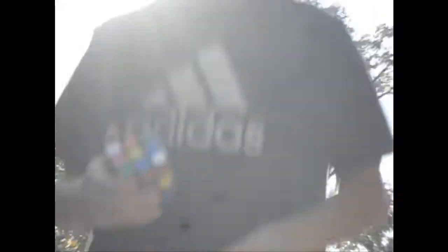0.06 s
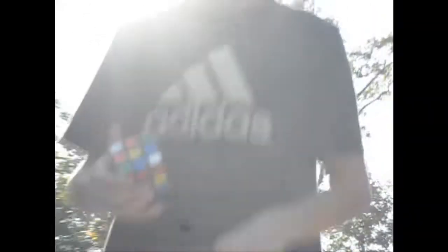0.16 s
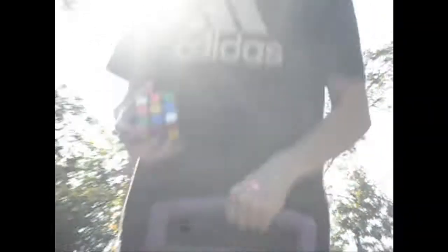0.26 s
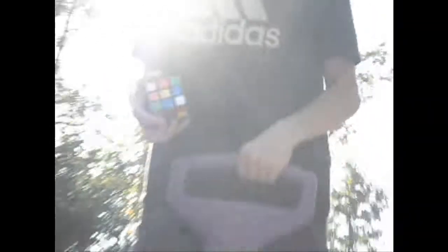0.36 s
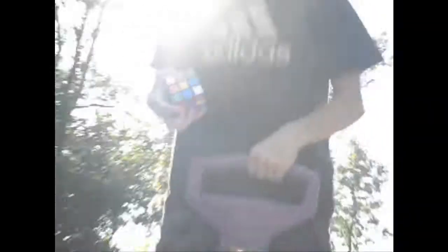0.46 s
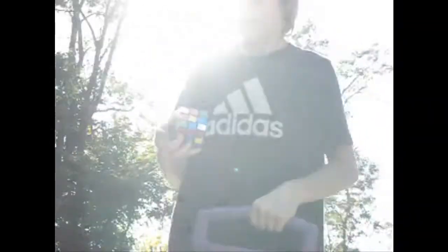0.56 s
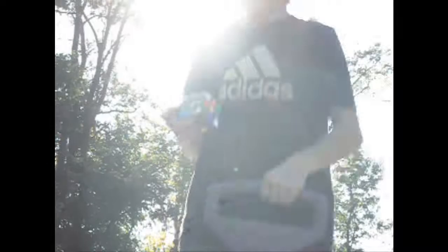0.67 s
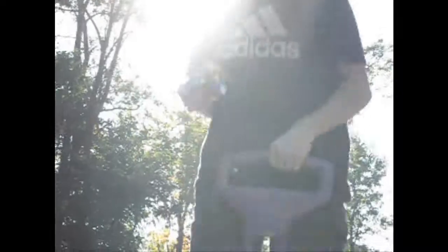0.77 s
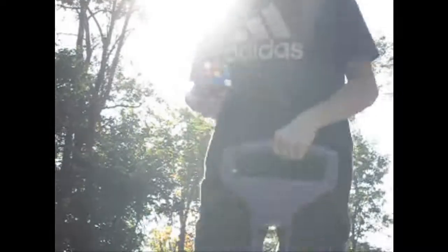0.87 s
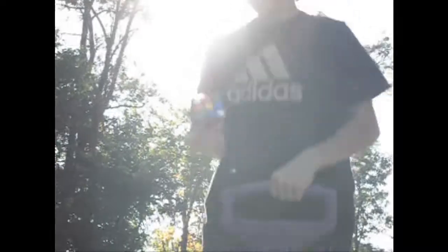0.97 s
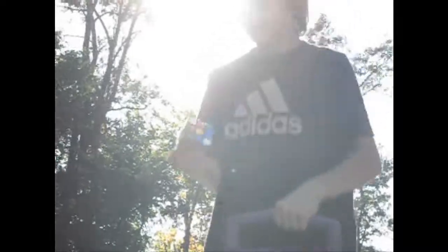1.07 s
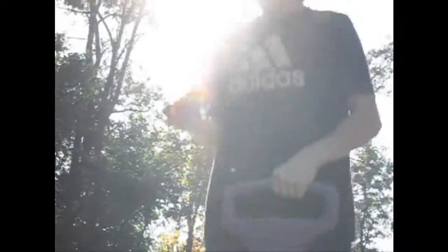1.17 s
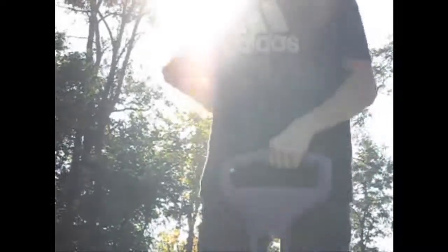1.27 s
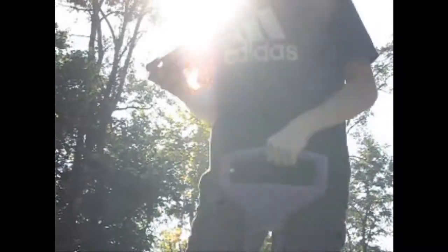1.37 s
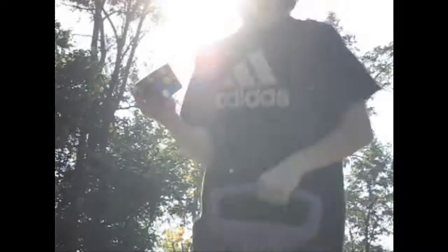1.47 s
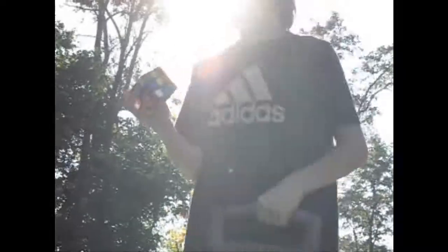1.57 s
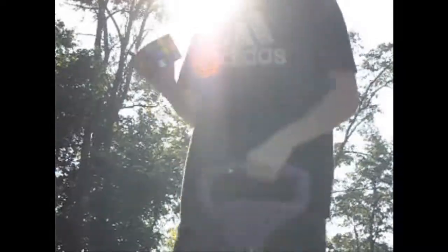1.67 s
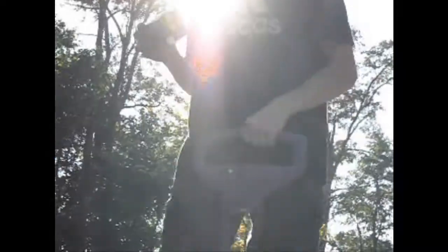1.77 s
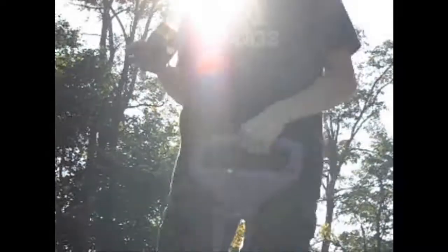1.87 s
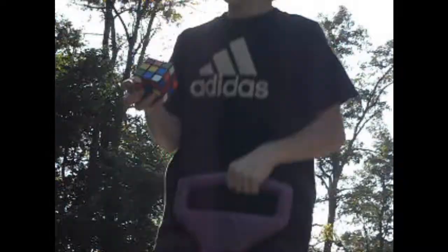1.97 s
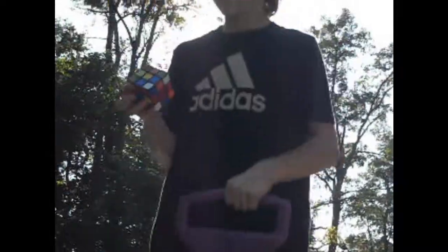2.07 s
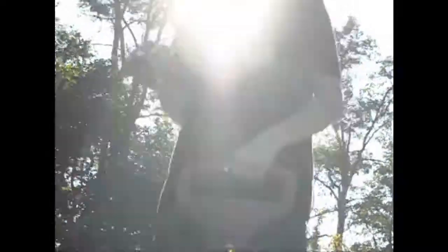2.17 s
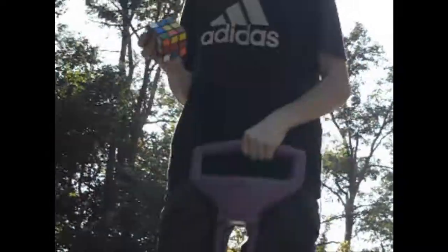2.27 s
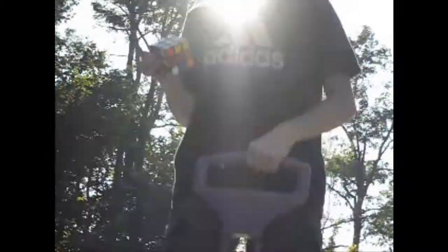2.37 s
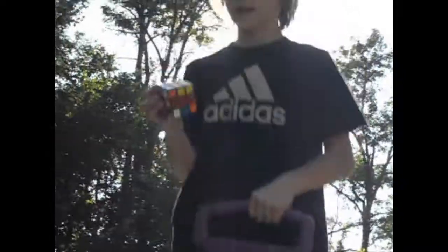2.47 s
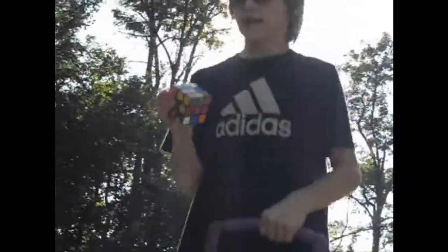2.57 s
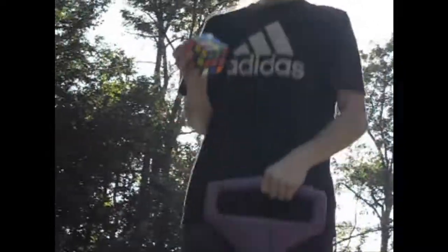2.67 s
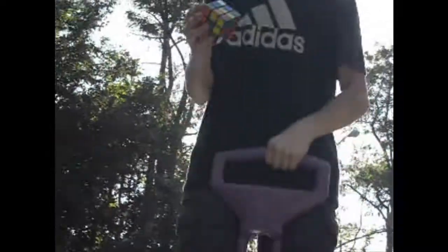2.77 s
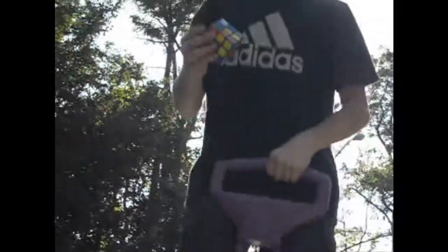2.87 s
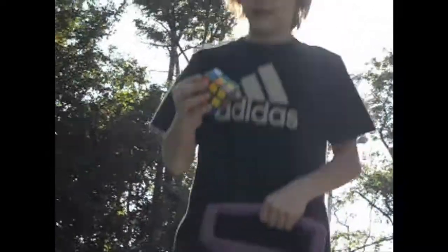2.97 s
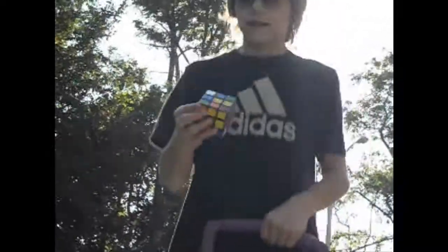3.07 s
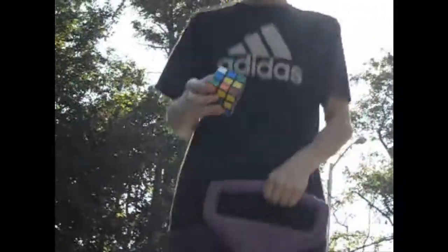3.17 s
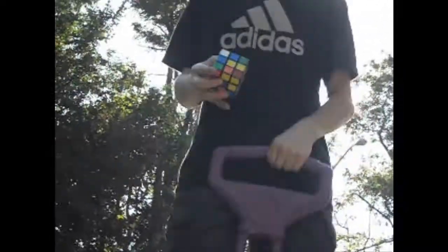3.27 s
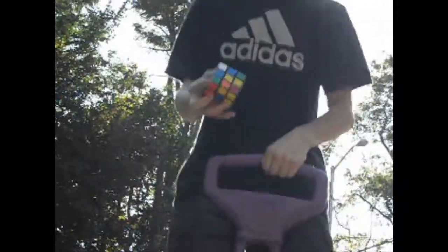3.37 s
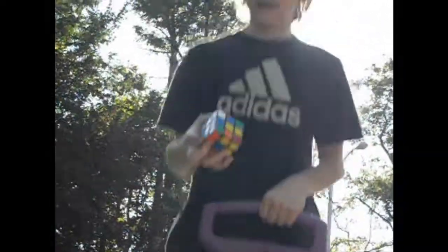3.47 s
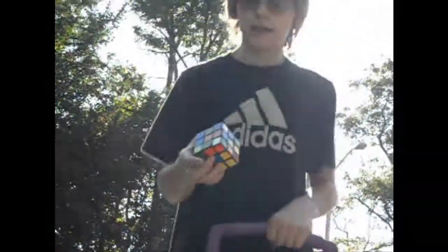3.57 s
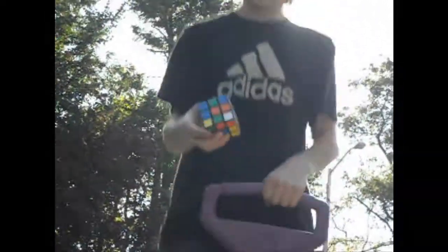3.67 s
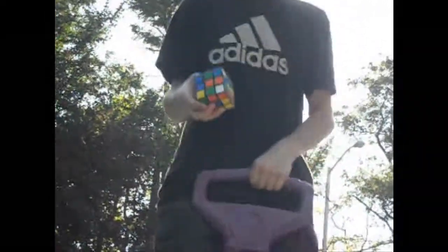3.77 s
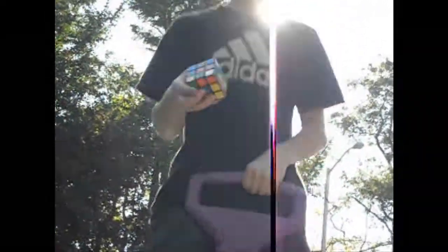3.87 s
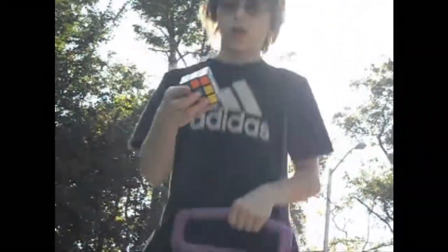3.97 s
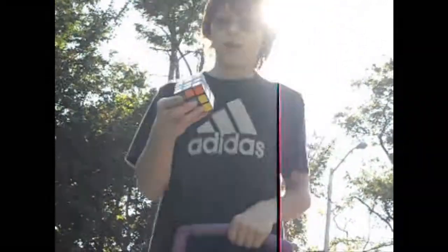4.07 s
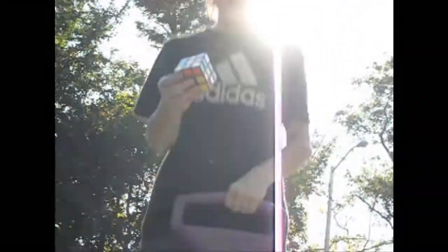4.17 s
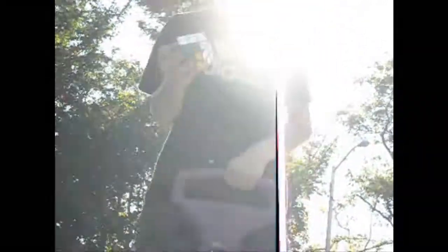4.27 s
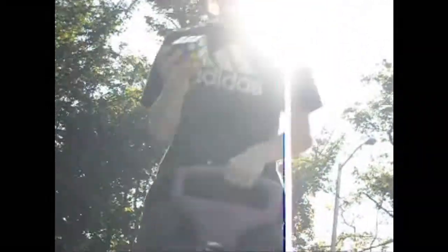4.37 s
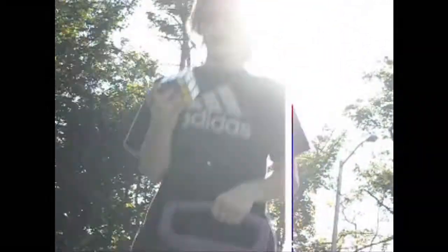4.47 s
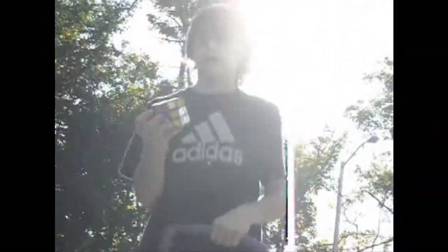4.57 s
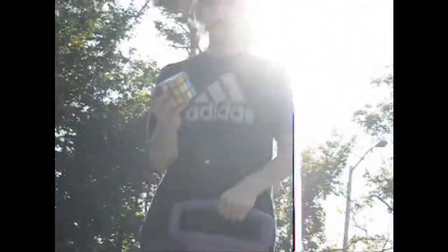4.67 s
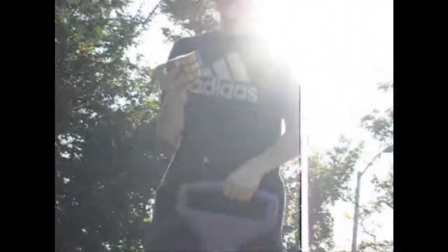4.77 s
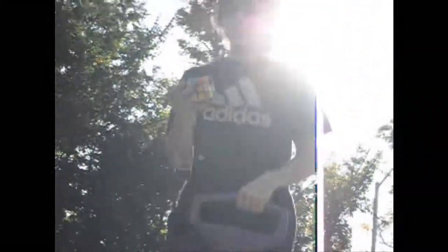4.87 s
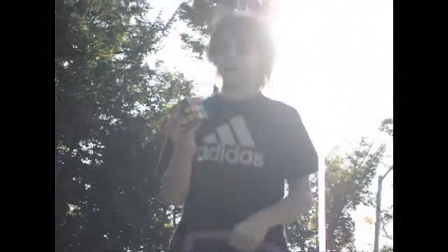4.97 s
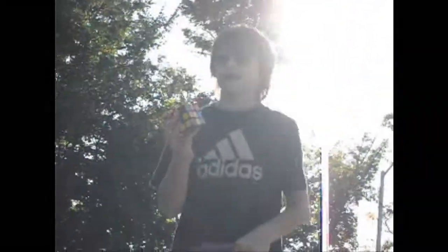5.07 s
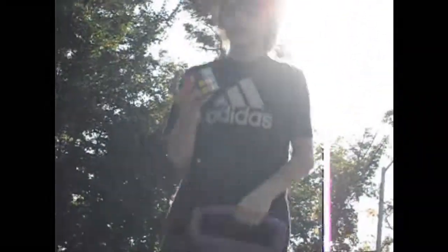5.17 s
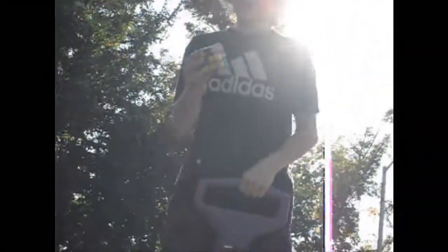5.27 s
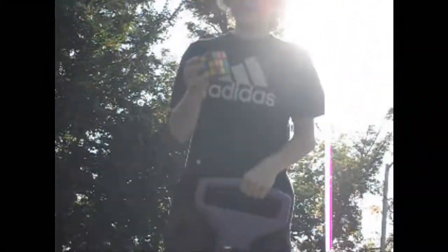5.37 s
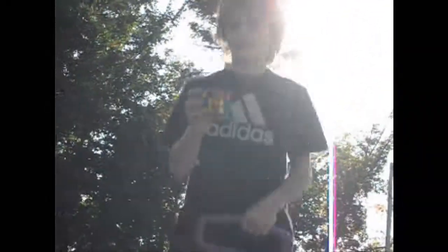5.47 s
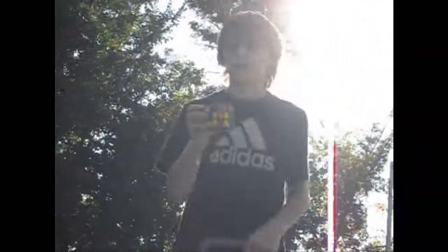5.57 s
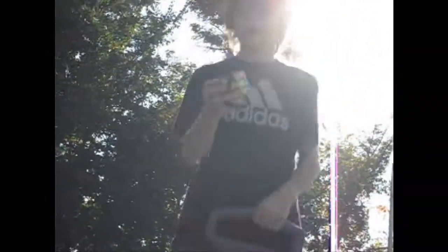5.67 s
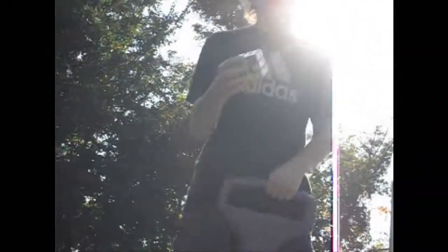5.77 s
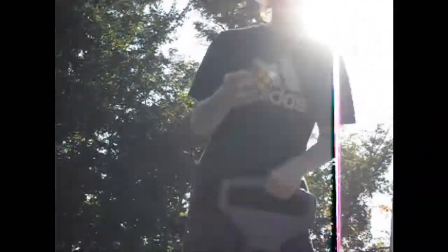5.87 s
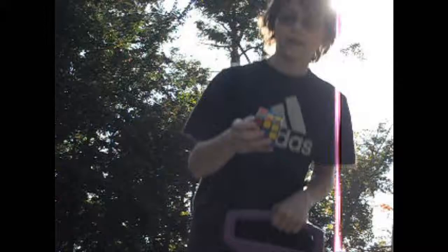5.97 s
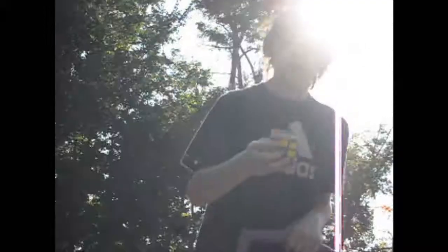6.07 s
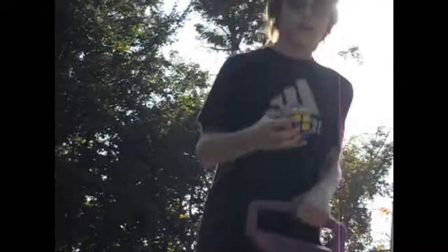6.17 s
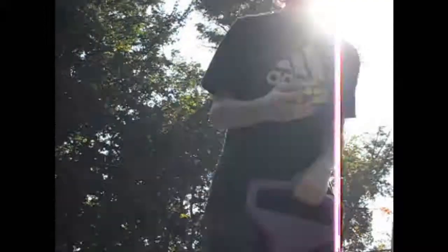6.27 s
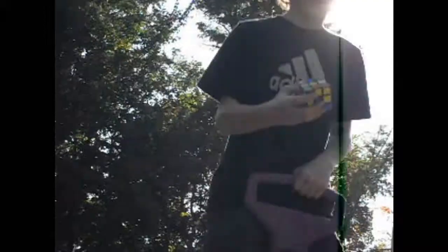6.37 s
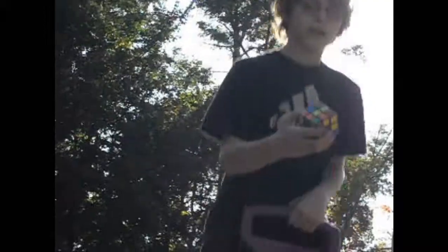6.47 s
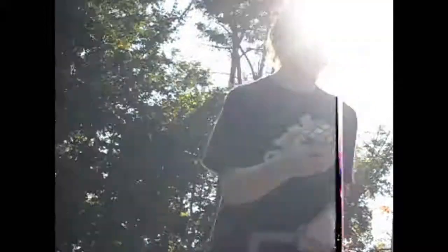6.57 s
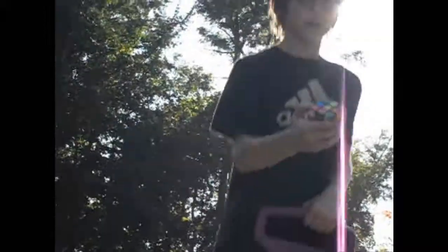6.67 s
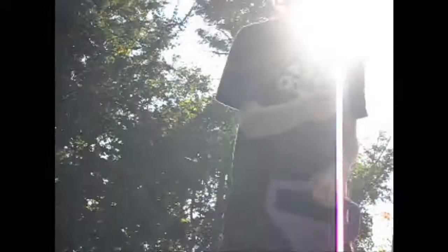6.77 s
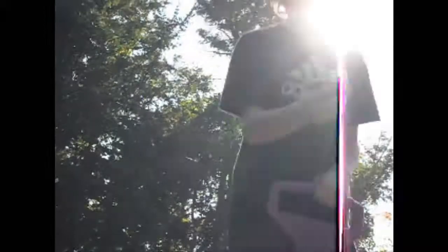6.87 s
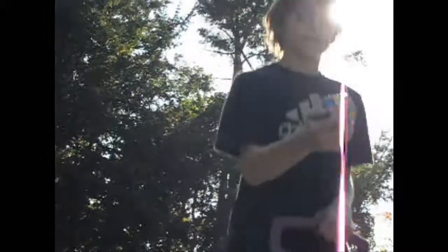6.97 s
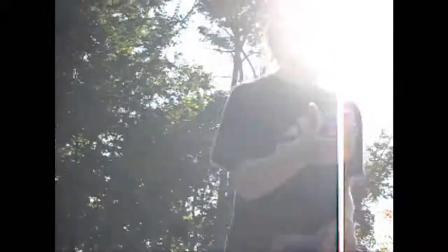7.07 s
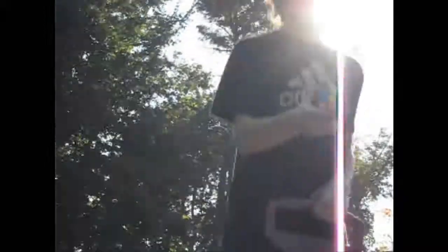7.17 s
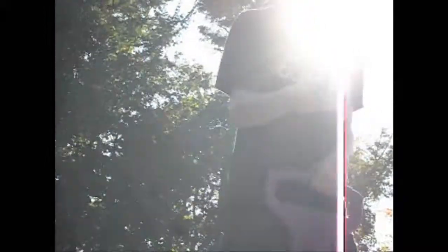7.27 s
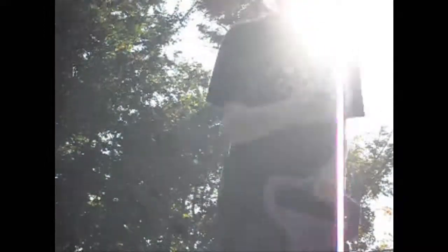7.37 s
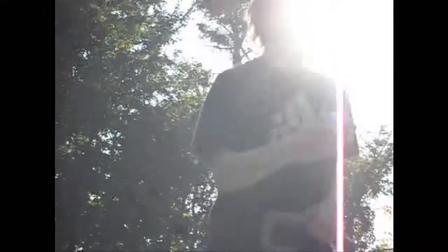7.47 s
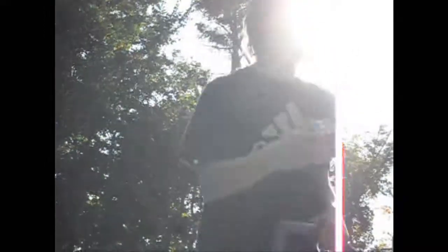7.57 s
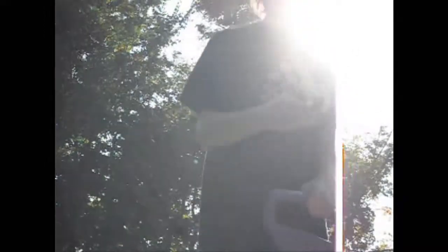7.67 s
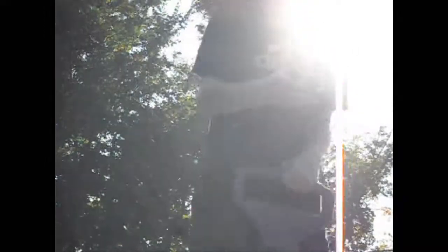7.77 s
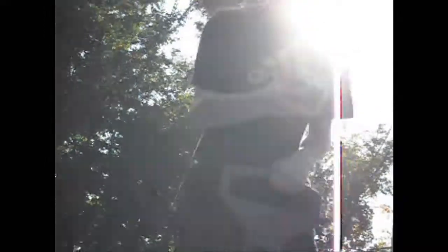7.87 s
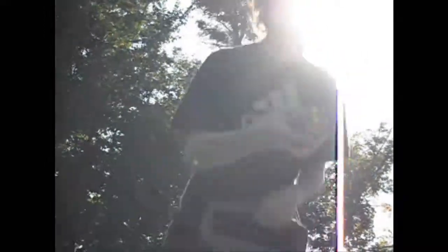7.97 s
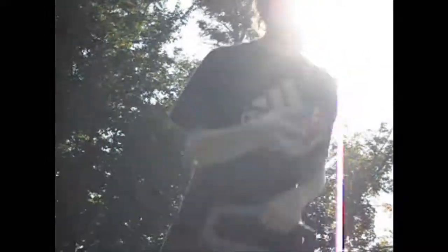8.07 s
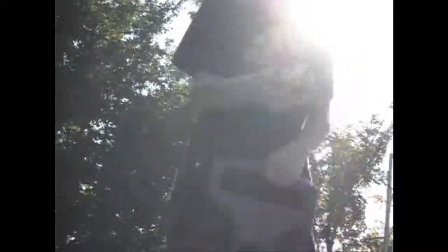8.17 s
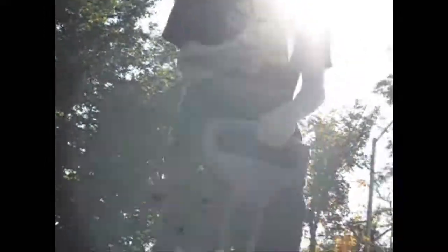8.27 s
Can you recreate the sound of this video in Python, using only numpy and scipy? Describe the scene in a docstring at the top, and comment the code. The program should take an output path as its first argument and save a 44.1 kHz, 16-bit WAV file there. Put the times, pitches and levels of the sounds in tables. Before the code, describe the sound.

After about half a second of silence, a pogo stick is heard bouncing close by on an asphalt road. The first sharp metallic clack comes at 0.7 seconds and repeats about every half second until just after 8 seconds. Each clack is the shaft hitting its stop at take-off, with a short, soft twang from the spring. Between the clacks come quieter, gritty landings, with the coil rattling and sometimes knocking as it compresses. A slight dull echo follows the hits, and very faint rustles fall between them. Distant traffic rumbles quietly throughout. A far engine faintly revs up from about 1 to 2.6 seconds. A car swells past around 4.3 seconds and a softer one around 8 seconds, while faint low hums surface in the rumble from about 5.7 seconds. The bouncing stays even up to the end at about 8.3 seconds.

```python
"""A pogo stick bounces on a road, each impact exciting its damped modes. The tip lands and the coil spring
rattles on its shaft as it compresses; at take-off the shaft clacks against its stop and the freed spring
twangs. The shaft hisses in its guide, faint rustles fall between blows, and trees and walls scatter a dull
echo. Far traffic rumbles and roars, an engine revs up, cars pass and low hums surface.
The sound starts after a short silence."""
import sys
import numpy as np
from scipy import signal
from scipy.fft import rfft, irfft, next_fast_len
from scipy.io import wavfile

SR = 44100
rng = np.random.default_rng(int(sys.argv[2]) if len(sys.argv) > 2 else 0)


def dump(signal):
    """Clip the signal to [-1, 1] and save it as 16-bit WAV at the path in sys.argv[1]."""
    limited = np.clip(np.atleast_2d(signal).T, -1, 1)
    pcm = np.round(limited * 32767).astype(np.int16)
    wavfile.write(sys.argv[1], SR, pcm)


N = 366912
START_S = .5585   # end of the silence


def from_db(db):
    """Amplitude ratio of a level in dB."""
    return 10 ** (np.asarray(db) / 20)


def rms_one(x):
    """Normalisation to rms 1."""
    return x / np.sqrt(np.mean(x ** 2) + 1e-20)


def add(out, s, sound):
    """Superposition: mixes a sound in at a time in seconds."""
    at = round(s * SR)
    out[at:at + len(sound)] += sound[:N - at]


def in_time(rows):
    """Linear interpolation of a table's columns at every sample."""
    s, *columns = np.transpose(rows)
    return [np.interp(np.arange(N) / SR, s, c) for c in columns]


def drift(rate_hz):
    """Slow random fluctuation: low-passed noise of rms 1."""
    r = np.exp(-80 * np.pi * rate_hz / SR)
    slow = signal.lfilter([1], [1, -2 * r, r * r], rng.standard_normal(N // 40 + 2002))[2000:]
    return np.interp(np.arange(N) / 40, np.arange(len(slow)), rms_one(slow))


def coloured(spectrum, flicker_db, rate_hz):
    """Spectral shaping: noise of a given spectrum and wavering level, at rms 1."""
    size = next_fast_len(N)
    hz, db = np.transpose(spectrum)
    bins_hz = np.arange(size // 2 + 1) * SR / size
    gain = from_db(np.interp(np.log(bins_hz + 1), np.log(hz), db))
    noise = irfft(rfft(rng.standard_normal(size)) * gain, size)[:N]
    return rms_one(noise * from_db(flicker_db * drift(rate_hz)))


def resonance(x, hz, width):
    """Damped resonator: a two-pole band of peak gain 1."""
    r = np.exp(-np.pi * width / SR)
    poles = [1, -2 * r * np.cos(2 * np.pi * hz / SR), r * r]
    return signal.lfilter(np.array([1, 0, -1]) * (1 - r * r) / 2, poles, x)


def contacts(surface, alike):
    """Partial correlation: the same surfaces meet each time, so a share of the pattern repeats."""
    return np.sqrt(alike) * surface + np.sqrt(1 - alike) * rng.standard_normal(len(surface))


def shaking(contact, rise_s, hit_t60_s, rattle_db, length_s, sag_db, fade_s, grains_db):
    """Contact forces: a brief hit, and coil rattle that sags and dies once the spring stops moving."""
    t = np.arange(len(contact)) / SR
    hit = (1 - np.exp(-(t / rise_s) ** 2)) * from_db(-60 * t / hit_t60_s)
    decay = from_db(rattle_db - sag_db * t / length_s - 60 * np.maximum(t - length_s, 0) / fade_s)
    noise = rng.standard_normal(len(t))
    grains = rms_one(noise * from_db(grains_db * np.minimum(rng.exponential(1, len(t)), 4)))
    bunches = rms_one(signal.lfilter(*signal.butter(2, 150, fs=SR), rng.standard_normal(len(t))))
    rattle = grains * from_db(1.5 * bunches) * decay * np.minimum(t / 0.0037, 1)
    return np.array([contact * hit, rattle])


# modes of the stick: (frequency [Hz], bandwidth [Hz], landing level [dB], take-off level [dB])
STICK_MODES = [(124, 145, -5, -5), (229, 81, -2.5, -2.5), (321, 63, -5.5, -3), (593, 103, -4, -10),
               (670, 66, -4.5, -8), (852, 135, 1, 2.5), (1030, 74, -3.5, -4), (1067, 19, -15, -18),
               (1300, 130, -7, 0), (1502, 155, -3, -7), (1722, 170, -1.5, 3), (1953, 270, 0, -13.5),
               (2150, 107, 1, -13), (2390, 280, -0.5, 4.5), (3200, 630, 0, 0), (3900, 920, -6.5, -3.5),
               (4590, 360, -1.5, -0.5), (5430, 960, -1.5, 0.5), (5724, 390, -1, -0.5),
               (6240, 250, -1.5, -6), (7060, 870, -11, -43), (8700, 1000, -10, -21),
               (9670, 360, -10.5, -11.5)]
AT_LANDING, AT_TAKE_OFF = 2, 3   # its level columns
THUD, BODY, CLANG, GRIT = range(4)   # bands of modes, low to high
BODY_HZ, CLANG_HZ, GRIT_HZ = 450, 1500, 2800   # lower band edges


def blow(force, column, bands_db, favoured_hz, detune, duller_db=(0, 0, 0, 0), db_per_octave=5):
    """Modal superposition: hit and rattle drive every mode; the blow's angle favours some of them."""
    scatter = rng.standard_normal((len(STICK_MODES), 2))
    signs = rng.choice([-1., 1.], (len(STICK_MODES), force.shape[1]))
    bands = np.zeros((4,) + force.shape)   # band, hit or rattle, sample
    for k, mode in enumerate(STICK_MODES):
        hz, width = mode[:2]
        band = sum(hz > edge for edge in (BODY_HZ, CLANG_HZ, GRIT_HZ))
        octaves_away = abs(np.log2(hz / favoured_hz[band - BODY])) if band in (BODY, CLANG) else 0
        level_db = mode[column] + 1.5 * scatter[k, 0] - db_per_octave * octaves_away
        # rattle and grit come from contacts at many places: no common phase
        drive = force * signs[k] if band == GRIT else force * [np.ones_like(signs[k]), signs[k]]
        ringing = resonance(drive, hz * (1 + detune * scatter[k, 1]), width)
        bands[band] += from_db(level_db) * np.sqrt(100 / width) * (-1) ** k * ringing
    # the tube radiates little just above its clang, and little at the very top
    bands[CLANG] = signal.sosfilt(signal.butter(4, GRIT_HZ, fs=SR, output="sos"), bands[CLANG])
    bands[GRIT] = signal.sosfilt(signal.butter(2, GRIT_HZ, "high", fs=SR, output="sos"), bands[GRIT])
    bands[GRIT] = signal.lfilter(*signal.butter(1, 7000, fs=SR), bands[GRIT])
    force_energy = np.sum(force ** 2, axis=1, keepdims=True)
    bands /= np.sqrt(np.sum(bands ** 2, axis=2, keepdims=True) / force_energy)
    hit, rattle = bands[:, 0], bands[:, 1]
    rattle[GRIT] *= from_db(-49 * np.arange(force.shape[1]) / SR)   # brightness falls 49 dB/s
    rattle *= from_db(-np.array(duller_db))[:, None]   # coils touch more softly than tip or stop
    return from_db(bands_db) @ (hit + rattle)


def opening_rattle(stop):
    """Damped vibration: a faint coil rattle dies away as the sound starts."""
    out = np.zeros(N)
    force = shaking(contacts(stop, alike=0), rise_s=0.00045, hit_t60_s=0.048, rattle_db=0,
                    length_s=0.013, sag_db=5, fade_s=0.22, grains_db=4)
    ring = blow(force, AT_LANDING, [-11, -1.5, -10.5, -19], favoured_hz=(950, 2100), detune=0.018)
    add(out, START_S, from_db(-39) * ring)
    return out


def echoes(x, level_db=-23.5, t60_s=0.27, cutoff_hz=1460):
    """Diffuse scattering: trees and walls return a dull, exponentially dying wash."""
    t = np.arange(round(.5 * SR)) / SR
    wash = rng.standard_normal(len(t)) * from_db(-60 * t / t60_s) * (t > .012)
    wash = signal.lfilter(*signal.butter(1, cutoff_hz, fs=SR), wash)
    return from_db(level_db) * signal.fftconvolve(x, wash / np.sqrt(np.sum(wash ** 2)))[:N]


# course of the far traffic: (time [s], rumble level [dB], tyre roar level [dB])
TRAFFIC_LEVELS = [(0.8, -55, -51.5), (1.6, -61.5, -52.5), (2.3, -50.5, -50.5), (3.0, -50.5, -51.5),
                  (3.8, -45, -50.5), (4.5, -50.5, -50.5), (5.6, -55, -51.5), (6.6, -52, -52.5),
                  (7.1, -49, -51), (8.0, -47.5, -48.5), (8.32, -52, -51.5)]
# spectra of its four layers: (frequency [Hz], relative spectral density [dB])
DRONE_SPECTRUM = [(13, -38), (22, -2.5), (48, -9), (70, 2), (97, -1.5), (130, -0.5),
                  (170, -25), (290, -120)]
RUMBLE_SPECTRUM = [(76, -29), (130, -10), (162, -6.5), (242, -1), (286, -5.5), (344, -6.5), (600, -11.5),
                   (780, -36), (1320, -120)]
ROAR_SPECTRUM = [(450, -25), (650, -6), (800, -3.5), (950, 2.5), (1150, -6), (1600, -9.5), (2000, -11),
                 (2600, -15), (3100, -32), (5000, -80)]
HISS_SPECTRUM = [(1760, -34), (3000, 8), (4520, 3.5), (4960, 4), (5870, 1.5), (7310, -1), (10500, -6.5),
                 (13600, -62), (22000, -120)]


def traffic():
    """Incoherent addition: deep drone, rumble, tyre roar and a hiss that weakly follows the rumble."""
    rumble_db, roar_db = in_time(TRAFFIC_LEVELS)
    hiss_db = -67 + 0.2 * (rumble_db - rumble_db.mean())
    return (from_db(-55) * coloured(DRONE_SPECTRUM, flicker_db=0.8, rate_hz=3.8)
            + from_db(rumble_db) * coloured(RUMBLE_SPECTRUM, flicker_db=1.34, rate_hz=3.5)
            + from_db(roar_db) * coloured(ROAR_SPECTRUM, flicker_db=1.5, rate_hz=4.5)
            + from_db(hiss_db) * coloured(HISS_SPECTRUM, flicker_db=0.7, rate_hz=20))


def slide():
    """Sliding friction: the shaft hisses in its guide while the tip is on the road."""
    t = np.arange(N) / SR
    times_landed = np.searchsorted([START_S] + [row[0] for row in LANDINGS], t)
    times_lifted = np.searchsorted([row[0] for row in CLACKS], t)
    hiss = rms_one(resonance(rng.standard_normal(N), hz=4500, width=1600))
    return from_db(-72 + 1.5 * drift(24)) * (times_landed - times_lifted) * hiss


# faint bright rustles between blows: (time [s], level [dB], centre frequency [Hz])
RUSTLES = [(.655, -59, 3900), (1.14, -60, 5500), (1.157, -56, 4000), (1.626, -59, 3400), (2.104, -54, 3800),
           (2.124, -55, 5500), (4.13, -56, 4500), (4.39, -58, 3600), (6.134, -60, 3800)]


def rustles(rise_s=0.004, decay_s=0.021):
    """Exponential decay: brief puffs of bright band noise."""
    out, t = np.zeros(N), np.arange(round(.1 * SR)) / SR
    for s, level_db, hz in RUSTLES:
        puff = rms_one(resonance(rng.standard_normal(len(t)), hz, width=1740))
        add(out, s, from_db(level_db) * puff * np.minimum(t / rise_s, 1) * np.exp(-t / decay_s))
    return out


# take-offs: (time [s], body level [dB], clang re body [dB], rattle level [dB], twang level [dB],
# favoured clang frequency [Hz])
CLACKS = [(0.699, -11.5, 1, -30, -41, 1640), (1.181, -10.5, 0, -30, -39.5, 2520),
          (1.659, -8.5, -2.5, -27, -40, 1890), (2.150, -9.5, -1.5, -29, -36, 1910),
          (2.641, -8.5, -1.5, -29.5, -42, 2380), (3.144, -8, -2.5, -29.5, -38.5, 2380),
          (3.65, -11, 0.5, -31, -36.5, 1680), (4.141, -12, 0.5, -30.5, -41, 2370),
          (4.645, -11, -2.5, -30.5, -40.5, 2440), (5.166, -12.5, -3, -31, -42.5, 2400),
          (5.672, -12.5, -3, -28, -41.5, 2410), (6.178, -14, -3, -31.5, -40, 1520),
          (6.669, -11.5, -1, -29, -40, 2370), (7.151, -13.5, -2, -30, -41.5, 1710),
          (7.654, -15, -2.5, -35.5, -46, 2370), (8.119, -9.5, -4, -31, -40, 2390)]


def clacks(stop, thud_db=-23.5):
    """Impact excitation: the shaft strikes its stop at take-off and the stick rings."""
    out = np.zeros(N)
    for s, body_db, clang_db, rattle_db, _, clang_hz in CLACKS:
        force = shaking(contacts(stop, alike=0.42), rise_s=0.0013, hit_t60_s=0.018,
                        rattle_db=rattle_db - body_db, length_s=0.027,
                        sag_db=11, fade_s=0.62, grains_db=0.5)
        bands_db = [thud_db, body_db, body_db + clang_db, body_db - 11]
        add(out, s, blow(force, AT_TAKE_OFF, bands_db, favoured_hz=(815, clang_hz), detune=0.029,
                         duller_db=[0, 1.5, 1.5, -6]))
    return out


def twang(pitch_hz=1010, width_hz=70, swell_s=0.026):
    """Resonance: at each take-off the freed spring swells into a short ring near one pitch."""
    out, t = np.zeros(N), np.arange(round(.15 * SR)) / SR
    swell = (t / swell_s * np.exp(1 - t / swell_s)) ** 2
    for s, *_, twang_db, _ in CLACKS:
        hz = pitch_hz * (1 + 0.023 * rng.standard_normal())
        ring = resonance(resonance(rng.standard_normal(len(t)), hz, width_hz), hz, width_hz)
        add(out, s, from_db(twang_db) * swell * rms_one(ring))
    return out


# landings: (time [s], body level [dB], clang re body [dB], grit re body [dB], rattle length [s],
# favoured clang frequency [Hz])
LANDINGS = [(0.963, -21, 1.5, -3.5, 0.057, 2100), (1.445, -23.5, -5, -5.5, 0.059, 1760),
            (1.931, -23, -1.5, -3.5, 0.06, 2160), (2.427, -20.5, -1.5, -4, 0.057, 2002),
            (2.924, -21, -3.5, -5, 0.061, 2070), (3.427, -20, -5.5, -4.5, 0.064, 2030),
            (3.91, -19, -4, -8.5, 0.065, 2030), (4.421, -22.5, -4.5, -5.5, 0.053, 1770),
            (4.948, -24, -1.5, -4, 0.056, 1540), (5.461, -23, -5.5, -4.5, 0.045, 2210),
            (5.948, -19.5, -5.5, -8, 0.062, 2320), (6.446, -21.5, -4.5, -6.5, 0.067, 1700),
            (6.936, -22.5, -2, -5.5, 0.041, 2100), (7.413, -23.5, -2.5, -7, 0.055, 2010),
            (7.903, -22, -5.5, -8, 0.067, 2150)]


def landings(tip, thud_db=-32.5, rattle_db=-36.5):
    """Impact and compression: the rider's weight sets thud and rattle, however sharp the tip's hit."""
    out = np.zeros(N)
    for s, body_db, clang_db, grit_db, length_s, clang_hz in LANDINGS:
        force = shaking(contacts(tip, alike=0.42), rise_s=.0001, hit_t60_s=0.042,
                        rattle_db=rattle_db - body_db, length_s=length_s,
                        sag_db=2, fade_s=0.13, grains_db=5.5)
        bands_db = [thud_db, body_db, body_db + clang_db, body_db + grit_db]
        add(out, s, blow(force, AT_LANDING, bands_db, favoured_hz=(870, clang_hz), detune=0.024,
                         duller_db=[-1.5, -2.5, 2.5, 1]))
    return out


# lone coil knocks: (time [s], body level [dB], clang re body [dB])
KNOCKS = [(0.9944, -24.5, -19), (1.4716, -34, -2), (1.497, -30, 2), (1.9859, -27.5, 4.5), (2.9504, -31, 0),
          (2.9761, -23, -4.5), (3.4798, -31, 1), (3.9434, -33, 3), (3.9633, -23, -0.5), (4.4458, -21.5, -1),
          (4.9754, -26.5, -3.5), (5.9614, -25, -8), (6.0038, -32.5, 3.5), (6.5044, -25.5, 0),
          (7.4392, -31, 7.5), (7.9524, -23, -5.5)]


def knocks(stop):
    """Selective excitation: a knocking coil rings mainly the modes near two frequencies."""
    out = np.zeros(N)
    for s, body_db, clang_db in KNOCKS:
        force = shaking(contacts(stop, alike=.3), rise_s=.0003, hit_t60_s=.025, rattle_db=-40,
                        length_s=.01, sag_db=0, fade_s=.05, grains_db=0)
        ring = blow(force, AT_LANDING, [-20, 0, clang_db, -12], favoured_hz=(880, 2080),
                    detune=0.014, db_per_octave=27)
        add(out, s, from_db(body_db) * ring)
    return out


# engine note: (time [s], frequency [Hz], main order level [dB], upper order level [dB])
ENGINE_NOTE = [(.95, 118, -69, -68), (1.37, 157, -51.5, -70), (1.5, 164, -61, -72), (1.85, 178, -59, -68),
               (2.15, 179, -67, -62), (2.42, 199, -49.5, -58), (2.65, 222, -64, -66)]


def engine(fade_s=0.2):
    """Engine orders: two tones in the ratio 2:3 rise together as a far engine revs up."""
    hz, main_db, upper_db = in_time(ENGINE_NOTE)
    t, phase = np.arange(N) / SR, 2 * np.pi * np.cumsum(hz) / SR
    fade = np.clip(np.minimum(t - ENGINE_NOTE[0][0], ENGINE_NOTE[-1][0] - t) / fade_s, 0, 1)
    orders = from_db(main_db) * np.sin(phase) + from_db(upper_db) * np.sin(1.5 * phase)
    return np.sqrt(2) * fade * from_db(1.5 * drift(16)) * orders


# passing cars: (peak time [s], rise [s], fall [s], frequency [Hz], bandwidth [Hz], level [dB])
PASSING_CARS = [(4.35, 0.47, 0.37, 858, 298, -39), (7.6, 0.88, 1.2, 4180, 3500, -68),
                (8.1, 0.29, 0.3, 1030, 576, -46.5)]


def passing_cars():
    """Rolling noise: a broad band of tyre sound swells and fades with each car."""
    out, t = np.zeros(N), np.arange(N) / SR
    for s, rise_s, fall_s, hz, width, level_db in PASSING_CARS:
        swell = np.exp(-((t - s) / np.where(t < s, rise_s, fall_s)) ** 2)
        band = resonance(resonance(rng.standard_normal(N), hz, width), hz, width)
        out += from_db(level_db + 2 * drift(6.2)) * swell * rms_one(band)
    return out


# low hums: (peak time [s], length [s], start frequency [Hz], end frequency [Hz], level [dB])
HUMS = [(5.718, 0.082, 224, 240, -49.5), (6.22, 0.23, 134, 163, -51), (7.154, 0.32, 251, 250, -50),
        (7.5, 0.12, 150, 147, -51.5), (7.799, 0.39, 257, 250, -54), (8.18, 0.12, 141, 159, -51)]


def hums():
    """Linear chirps: soft gliding tones surface in the rumble under Gaussian envelopes."""
    out, t = np.zeros(N), np.arange(N) / SR
    for s, length_s, from_hz, to_hz, level_db in HUMS:
        cycles = (from_hz + to_hz) / 2 * (t - s) + (to_hz - from_hz) / length_s * (t - s) ** 2 / 2
        swell = np.exp(-(2 * (t - s) / length_s) ** 2)
        out += from_db(level_db) * np.sqrt(2) * swell * np.sin(2 * np.pi * cycles)
    return out * from_db(0.76 * drift(12))


def scene():
    """Superposition: the stick and its echoes over the road noise."""
    tip, stop = rng.choice([-1., 1.], (2, round(.2 * SR)))   # contact patterns of the two surfaces
    tip[:12] = -1   # the tip slaps the road before anything rings
    stick = landings(tip) + clacks(stop) + knocks(stop) + opening_rattle(stop) + twang()
    near = stick + echoes(stick) + slide() + rustles()
    return (near + traffic() + passing_cars() + engine() + hums())[None]


def record(dry, hiss_db=-73, cutoff_hz=11340):
    """Self-noise and band limiting: microphone hiss, an opening silence and a steep treble cut."""
    heard = dry + from_db(hiss_db) * rng.standard_normal(N)
    gate = np.clip((np.arange(N) / SR - START_S) / 0.0011, 0, 1)
    return signal.sosfilt(signal.cheby2(14, 50, cutoff_hz, fs=SR, output="sos"), heard * gate)


dry = scene()
out = record(dry)
dump(out)
```